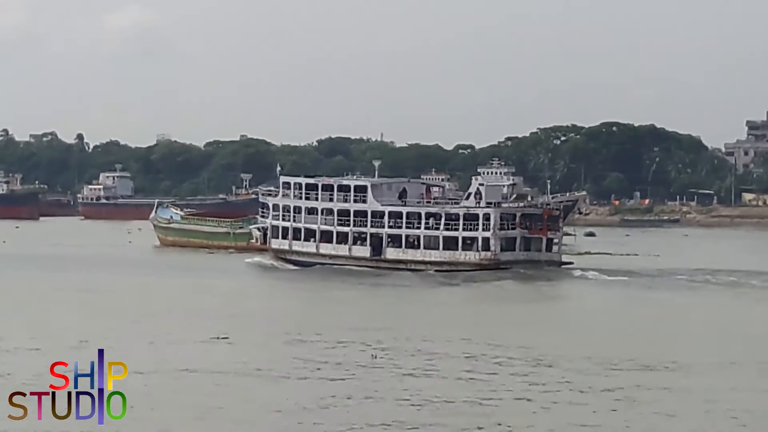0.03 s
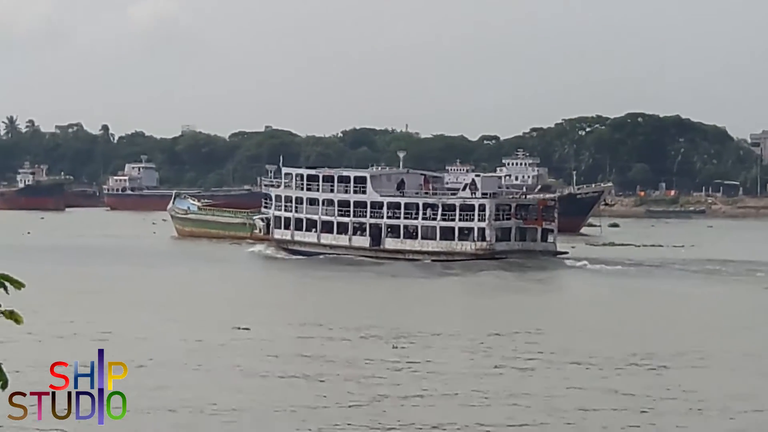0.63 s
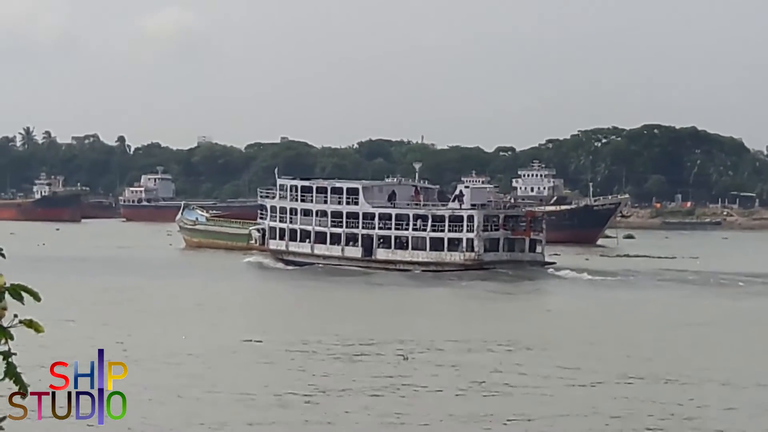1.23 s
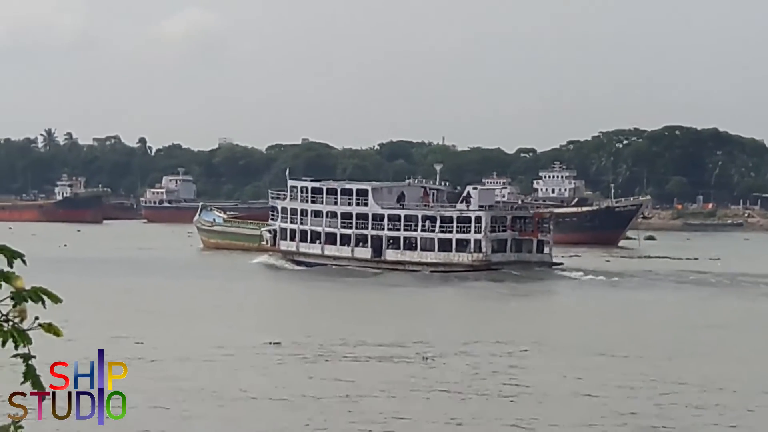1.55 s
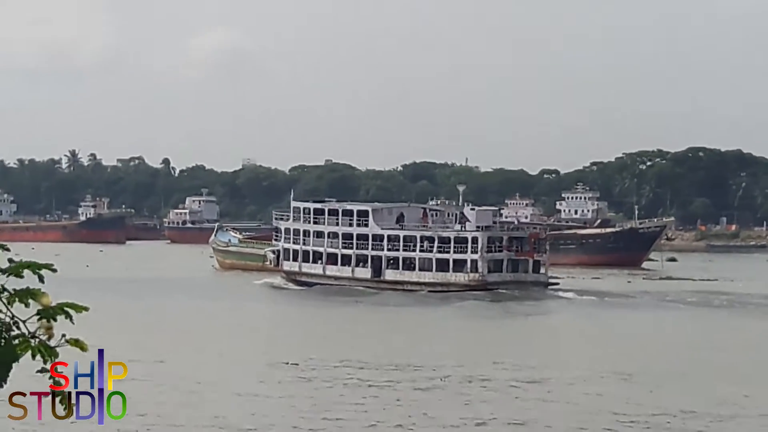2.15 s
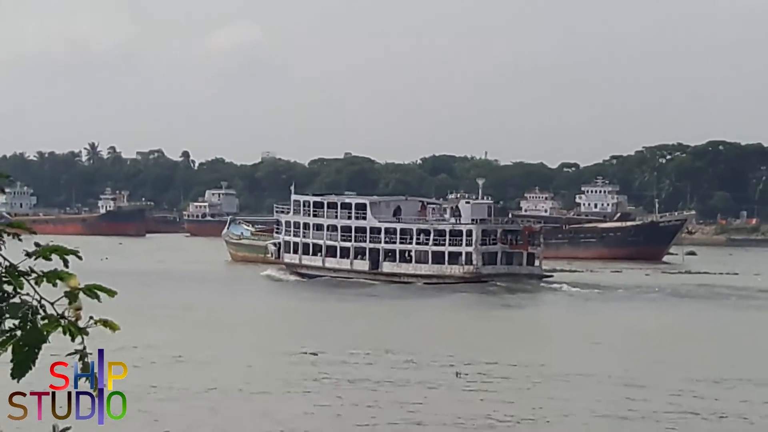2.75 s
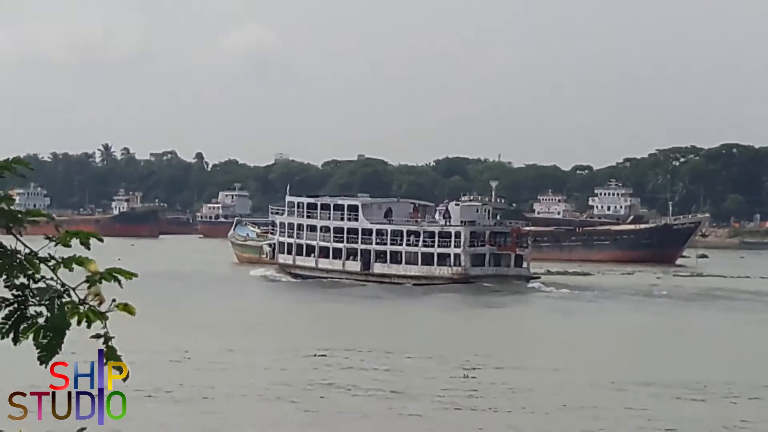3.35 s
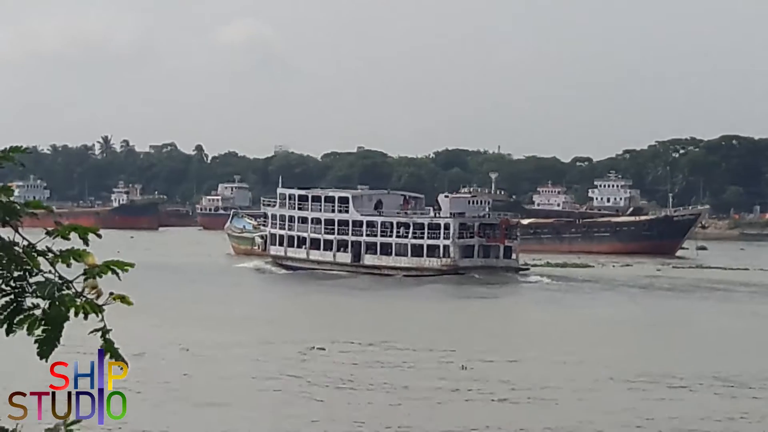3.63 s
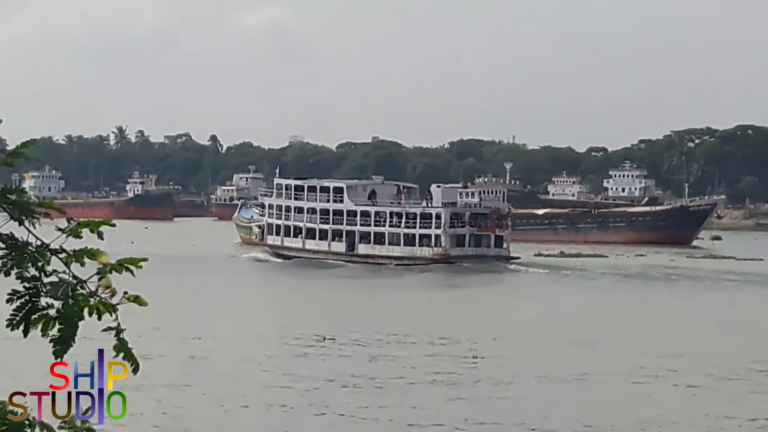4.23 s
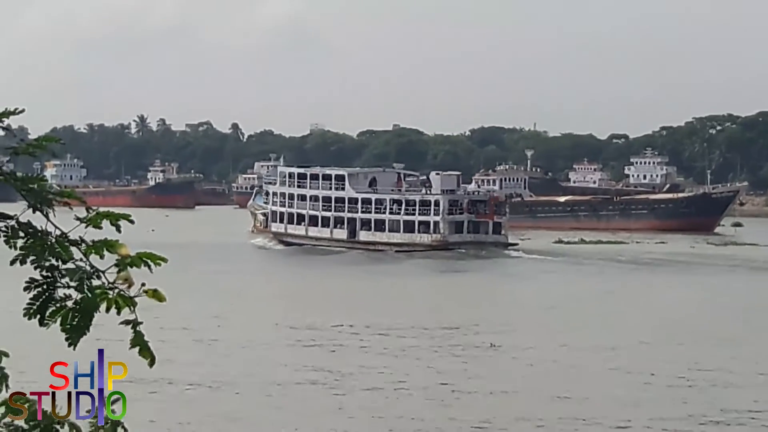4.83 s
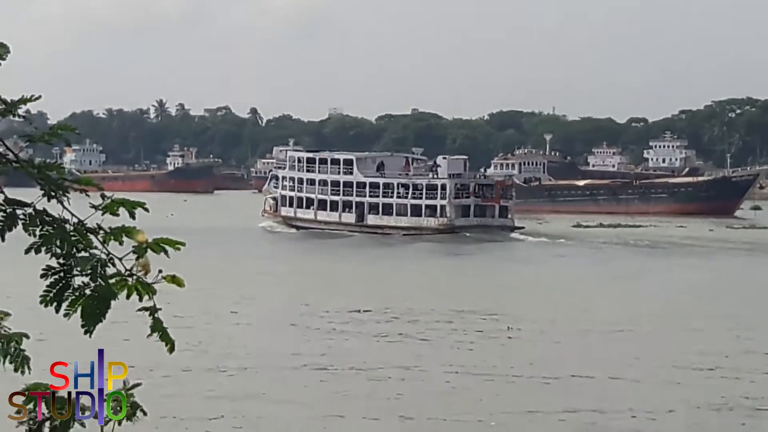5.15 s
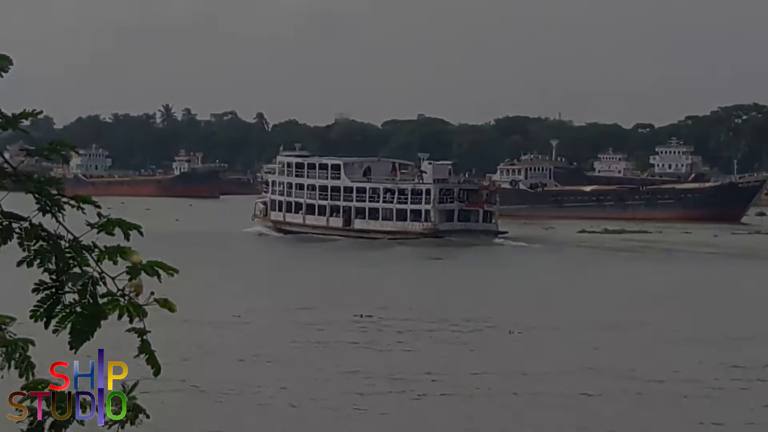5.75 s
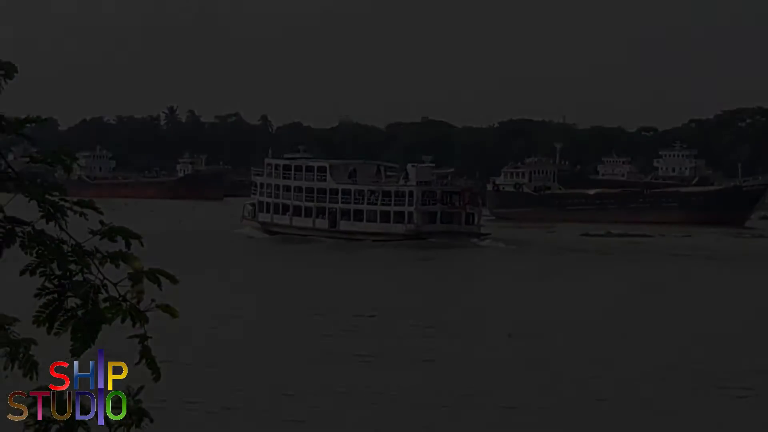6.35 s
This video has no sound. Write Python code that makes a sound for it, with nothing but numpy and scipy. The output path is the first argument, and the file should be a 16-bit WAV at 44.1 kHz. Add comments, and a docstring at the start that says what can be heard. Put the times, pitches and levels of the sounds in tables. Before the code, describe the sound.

A ship's siren winds up and holds a high, slowly swelling tone across open water, with a faint echo. Beneath it, the distant river ferry's diesel rumbles and rattles, and its wake rushes and splashes steadily, with an occasional light knock or tick. The microphone is on the riverbank. Finally the siren begins to coast down in pitch, and engine, water and horn fade together.

```python
"""A three-deck passenger ferry far out on a wide river, the microphone on the bank.
From the start its six-cylinder diesel drones and clatters over a generator's hum, the hull's wash
and a few knocks, while its horn, a motor-driven siren, spins up. The overtones sweep through the
horn's resonances and beat with an echo. The siren holds near 960 Hz, then coasts down from 5.74 s
as the whole sound fades."""
import sys
import numpy as np
from scipy import signal
from scipy.fft import rfft, irfft, next_fast_len
from scipy.io import wavfile
from scipy.ndimage import uniform_filter1d

SR = 44100
rng = np.random.default_rng(int(sys.argv[2]) if len(sys.argv) > 2 else 0)


def output_pcm(signal):
    """Save a mono or channel-first signal as 16-bit PCM at the path in sys.argv[1].

    Samples are clipped to [-1, 1] before scaling.
    """
    pcm = np.clip(np.atleast_2d(signal).T, -1, 1) * 32767
    wavfile.write(sys.argv[1], SR, np.round(pcm).astype(np.int16))


N = 290619
TIME = np.arange(N) / SR


def siren(shimmer_db=.48, flutter_db=9, wobble=.0003, fading=.31, echo_share=.44, echo_dulling=.38):
    """A rotor chops air into a tone; the motor spins it up, air drag slows it once the power is off."""
    # The pitch the motor pulls towards. Each row: time in seconds, pitch in Hz.
    full_speed = [(0, 961), (2.3, 961), (3.8, 963), (4.9, 960)]
    # The fundamental as it arrives over the water. Each row: time in seconds, level in dB.
    fundamental = [(0, -33.5), (.33, -27), (.6, -40.5), (.95, -40), (1.2, -33), (2.08, -26), (2.64, -29),
                   (3.05, -25.5), (3.5, -29.5), (4.5, -22), (5.06, -28), (5.72, -22.5), (5.82, -31.5),
                   (6.03, -36), (6.2, -50), (6.58, -47)]
    # The octave as it arrives over the water. Each row: time in seconds, gain in dB.
    octave = [(1.75, 4), (2.1, -4.5), (2.9, 4), (4.4, 3), (4.9, -3.5), (5.7, 1), (6.1, -11.5), (6.55, 10)]
    # The treble, from the third partial up. Each row: time in seconds, gain in dB.
    treble = [(1, -2), (1.5, -4), (2.6, -4), (3.4, 2), (4.3, 2), (5, 0.5), (5.8, -1.5), (6, -9), (6.5, -4)]
    start_shortfall, spin_up_s, switch_off_s, drag_per_s = .246, .72, 5.74, .41
    echo_lag_s, lag_shrink_s_per_s = .04947, .0011
    rolloff_db, turn_db_per_s, turn_mid_s = -4.5, .9, 4.4
    spin_up = 1 - start_shortfall * np.exp(-TIME / spin_up_s)
    coast = 1 / (1 + drag_per_s * np.maximum(TIME - switch_off_s, 0))
    speed = spin_up * coast
    hz = curve(full_speed) * speed
    turns = np.cumsum(hz * (1 + wobble * walk(14))) / SR
    # an echo off a moored hull: its lag shrinks as the ferry moves, so it beats with the direct sound
    echo_turns = turns - hz * (echo_lag_s - lag_shrink_s_per_s * TIME)
    # while the pitch glides, echoes make the fundamental flutter
    glide = uniform_filter1d(np.abs(np.gradient(speed)) * SR, size=4000)
    out = tone(turns, curve(fundamental) + (shimmer_db + flutter_db * glide) * walk(22))
    for k in range(2, 8):
        db = horn_db(k * hz) + curve(octave if k == 2 else treble)
        if k > 4:
            db += rolloff_db * (k - 4)  # the rotor's rounded puffs weaken the top partials
            db += turn_db_per_s * (TIME - turn_mid_s)  # they brighten as the ferry turns
        # moving air scatters the short waves in phase and level
        scatter_turns = fading * walk(8.2) / (2 * np.pi)
        direct = tone(k * turns + scatter_turns, db) * (1 + fading * walk(11))
        # the echo is strongest in the octave and duller above it
        echo = echo_share * echo_dulling ** np.log2(k - 1) * tone(k * echo_turns, db)
        out += direct + echo
    return banks(out, t60=1.6, wet_db=-22.5)


def horn_db(hz):
    """The horn's resonances lift an overtone as it glides through them; gives its level in dB."""
    # Each row: centre in Hz, width in Hz, peak level in dB.
    resonances = [(1400, 120, -49), (1784, 290, -40.5), (2220, 210, -49.5), (2620, 296, -42.5),
                  (3470, 240, -51), (3815, 180, -54.5), (4560, 710, -55), (5710, 260, -69),
                  (6720, 300, -74.5)]
    power = sum((undb(db) / (1 + (2 * (hz - centre) / width) ** 2)) ** 2
                for centre, width, db in resonances)
    return 10 * np.log10(power)


def diesel(firing_hz=79.03, uneven_db=2.0, scatter_db=4.0, slop_s=.00039, puff_turns=.28):
    """Six unequal cylinders fire into the exhaust; each firing shakes a clatter from the engine room."""
    # The engine as the ferry turns away. Each row: time in seconds, drone gain in dB, rumble in dB.
    engine = [(0, 1, -31), (1.3, 4, -33.5), (2.1, 0, -31), (3.1, -0.5, -29.5), (3.8, 1, -32),
              (4.7, 1.5, -28.5), (5.5, -0.5, -31.5), (6.5, -2, -29)]
    # Clean exhaust tones. Each row: multiple of the firing rate, level in dB.
    exhaust_tones = [(1, -37), (2, -39)]
    # Colours of the exhaust pipe, engine room and hull. Each row: frequency in Hz, relative level in dB.
    exhaust_colour = [(30, -48), (60, -9.5), (100, 2.5), (160, -4.5), (230, -1), (305, 2), (370, -4.5),
                      (470, -9), (600, -17), (1200, -53.5), (6000, -81)]
    clatter_colour = [(300, -15), (520, -8), (660, -0.5), (790, 1), (950, -3.5), (1100, -11), (1500, -14),
                      (2500, -40), (5000, -58), (8000, -88.5)]
    rumble_colour = [(20, -35), (34, -29), (44, -14.5), (56, -3.5), (67, -9), (80, 0), (140, 1),
                     (200, -0.5), (330, 0), (400, -5.5), (500, -17), (800, -23), (2000, -78), (8000, -88.5)]
    drone_db, rumble_db = (curve(np.array(engine)[:, [0, column]]) for column in (1, 2))
    turns = np.cumsum(firing_hz * (1 + .002 * walk(2))) / SR
    firings = np.flatnonzero(np.diff(np.floor(turns)))
    size_chance, time_chance = rng.uniform(-.98, 1, (len(firings), 2)).T * np.sqrt(3)
    # strong and weak cylinders repeat every cycle and fill in lines between the firing tones
    cylinders = np.array([.88, -.1, -.3, 1.3, -.14, -.71])
    size = undb(uneven_db * np.resize(cylinders, len(firings)) + scatter_db * size_chance)
    onsets = np.clip(firings + (slop_s * SR * time_chance).astype(int), 0, N - 1)
    # the even part of the firings is the drone; their unevenness thuds through the pipe
    drone = sum(tone(round(k) * turns, db + drone_db / k + walk(2.7)) for k, db in exhaust_tones)
    pulses = np.zeros(N)
    pulses[onsets] = size - size.mean()
    thuds = level(banks(colour(pulses, exhaust_colour), t60=.4, wet_db=3.5), -32.5)
    stroke_db = 1.4 * cylinders[turns.astype(int) % len(cylinders)]
    puffs = .5 + np.exp(-(turns % 1) / puff_turns)
    shake = puffs * undb(stroke_db + .36 * walk(45) + .83 * walk(17))
    clatter = level(colour(shake * rng.standard_normal(N), clatter_colour), -35.0)
    rumble = noise(rumble_colour) * undb(rumble_db + .42 * walk(20))
    return drone + thuds + clatter + rumble


def generator(hum_hz=44.6):
    """A smaller engine hums below the main one."""
    # The hum recedes from the bank. Each row: time in seconds, level in dB.
    hum_level = [(0, -44.5), (2.5, -41.5), (4, -47.5), (6.5, -52)]
    turns = np.cumsum(hum_hz * (1 + .008 * walk(3))) / SR
    return tone(turns, curve(hum_level) + 1.4 * walk(3.4))


def wash(drops_per_s=700, spread_db=3, drops_db=-7, churn_db=-8):
    """Bow wave and wake: a rush of foam with a crowd of small splashes in it."""
    # Colours of the foam and the stern's churn. Each row: frequency in Hz, relative level in dB.
    foam_colour = [(500, -1), (1100, 4), (1400, -4), (2100, 3), (2600, -2.5), (2900, -6), (3080, 1.5),
                   (3250, -1.5), (3700, -4), (4200, -13), (4900, -18.5), (5300, -24), (6000, -28.5),
                   (7000, -43), (8000, -53.5), (15000, -61)]
    churn_colour = [(700, -24.5), (1200, -2), (1550, 2.5), (1900, -11), (2800, -20.5), (7000, -79)]
    # The wash as it reaches the bank. Each row: time in seconds, level in dB.
    wash_level = [(0, -43), (1.7, -41.5), (6.5, -42)]
    sizes = rng.choice([-1, 1], N) * undb(spread_db * np.minimum(rng.exponential(size=N), 4))
    drops = (rng.random(N) < drops_per_s / SR) * sizes
    # the churn gurgles below the foam in uneven surges
    churn = noise(churn_colour) * undb(churn_db + .84 * walk(12))
    water = noise(foam_colour) + undb(drops_db) * colour(drops, foam_colour) + churn
    return level(water, 0) * undb(curve(wash_level) + .7 * walk(14))


def knocks(attack_s=.001):
    """Small knocks and ticks: damped rings, their attack rounded by distance, with a little echo."""
    # Each row: start in seconds, level in dB, ring in Hz, seconds to die away by 60 dB.
    strikes = [(0.329, -23, 1510, 0.016), (1.779, -16.5, 806, 0.034), (2.009, -29, 1090, .012),
               (2.031, -19.5, 2270, 0.019), (2.085, -22, 904, .012), (3.435, -29.5, 2460, 0.032),
               (5.335, -31, 2580, 0.026), (5.62, -30, 2570, 0.02), (5.883, -17.5, 865, 0.021),
               (6.187, -20, 840, 0.018), (6.264, -18, 820, 0.016)]
    out = np.zeros(N)
    for start, db, hz, t60 in strikes:
        age = np.maximum(TIME - start, 0)
        attack = 1 - np.exp(-(age / attack_s) ** 2)
        decay = undb(db - 60 * np.minimum(age / t60, 3))
        out += attack * decay * np.sin(2 * np.pi * hz * age)
    return banks(out, t60=.25, wet_db=-7.0)


def hiss():
    """A faint high hiss that rises a little in the second half."""
    # Its colour. Each row: frequency in Hz, relative level in dB.
    hiss_colour = [(7000, -13), (8200, -8), (9100, 2.5), (11000, 1.5), (12500, 5), (15500, 1.5)]
    # Its swell. Each row: time in seconds, level in dB.
    hiss_level = [(0, -78.5), (3.2, -75.5), (3.4, -71.5), (4.2, -68), (4.45, -72.5), (4.8, -69.5),
                  (6, -69.5), (6.4, -74)]
    return noise(hiss_colour) * undb(curve(hiss_level))


def banks(x, t60, wet_db):
    """Add the diffuse echo from moored hulls and the river banks."""
    t = TIME[:2 * SR]
    build_up = 1 - np.exp(-t / .041)
    tail = rng.standard_normal(len(t)) * undb(-60 * t / t60) * build_up
    return x + undb(wet_db) * signal.fftconvolve(x, tail / np.sqrt(np.sum(tail ** 2)))[:N]


def undb(db):
    """Decibels to gain."""
    return np.exp(np.log(10) * np.asarray(db) / 20)


def curve(rows):
    """Rows of seconds and value, joined by straight lines."""
    return np.interp(TIME, *np.transpose(rows))


def level(x, db):
    """Scale to an rms level."""
    return x * undb(db) / np.sqrt(np.mean(x ** 2))


def walk(rate):
    """Smooth chance with a spread near 1, changing about rate times a second."""
    hold = max(int(SR / rate), 2)
    steps = np.repeat(rng.standard_normal(N // hold + 2), hold)
    return 1.3 * uniform_filter1d(uniform_filter1d(steps, hold), hold)[:N]


def colour(x, points):
    """Causal filter through points of Hz and dB; output rms 1."""
    size = next_fast_len(N + SR // 4, real=True)
    hz, db = np.transpose(points)
    freqs = np.maximum(np.arange(size // 2 + 1) * SR / size, 1)
    gain = undb(np.interp(np.log(freqs), np.log(hz), db))
    # folding the cepstrum gives minimum phase
    cepstrum = irfft(np.log(gain), size)
    cepstrum[1:size // 2] *= 2
    cepstrum[size // 2 + 1:] = 0
    return level(irfft(rfft(x, size) * np.exp(rfft(cepstrum)), size)[:N], 0)


def noise(points):
    """Coloured noise, rms 1."""
    return colour(rng.standard_normal(N), points)


def tone(turns, db):
    """A sine of the given rms level on a phase counted in turns."""
    return np.sqrt(2) * undb(db) * np.sin(2 * np.pi * (turns % 1))


def scene():
    """The distant ferry from one spot on the bank, in mono; all fades at the end."""
    # The closing fade. Each row: time in seconds, gain in dB.
    fade = [(5.6, -1.5), (6, -4.5), (6.25, -5.5), (6.59, -11.5)]
    mix = hiss() + siren() + diesel() + generator() + wash() + knocks()
    return (mix * undb(curve(fade)))[None]


def record(dry):
    """The recorder behind the microphone cuts the bass below 36 Hz and the top above 15.7 kHz."""
    low_cut = signal.butter(8, 36, "highpass", fs=SR, output="sos")
    high_cut = signal.ellip(10, .1, 80, 15700, fs=SR, output="sos")
    return signal.sosfilt(high_cut, signal.sosfilt(low_cut, dry))


dry = scene()
out = record(dry)
output_pcm(out)
```